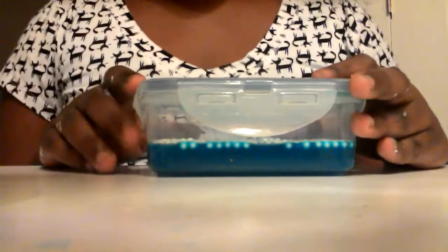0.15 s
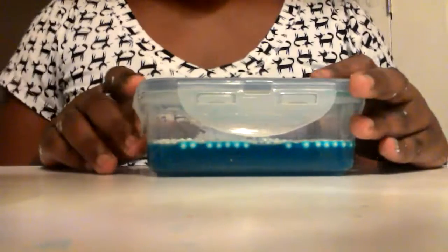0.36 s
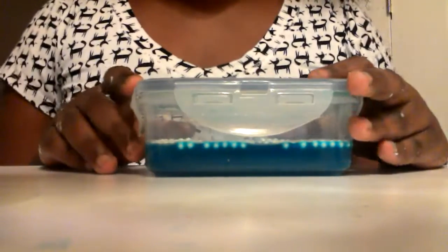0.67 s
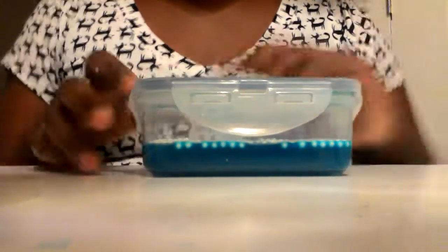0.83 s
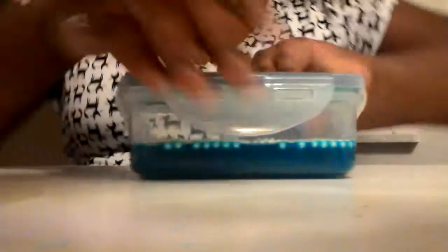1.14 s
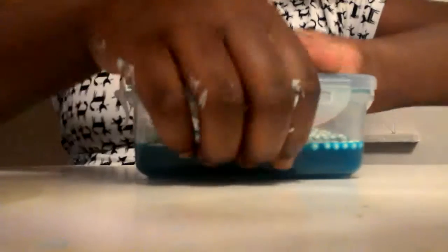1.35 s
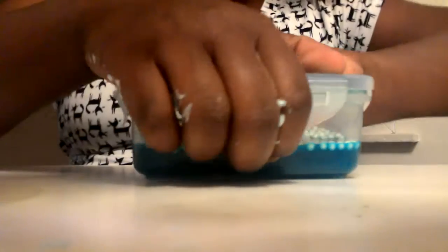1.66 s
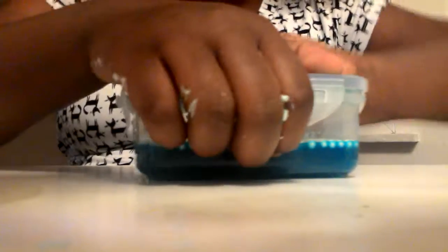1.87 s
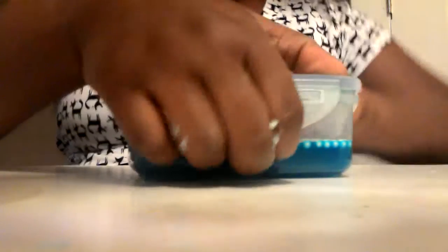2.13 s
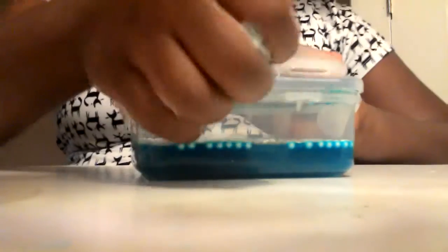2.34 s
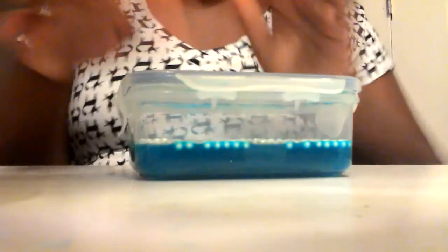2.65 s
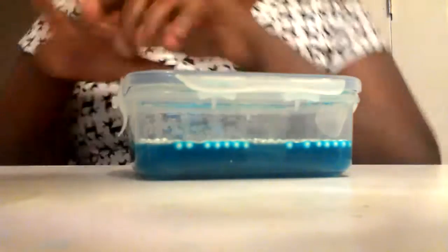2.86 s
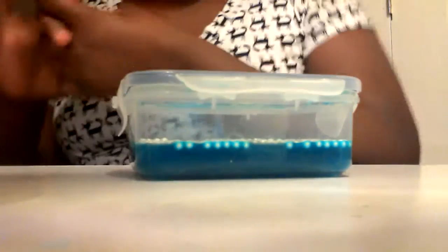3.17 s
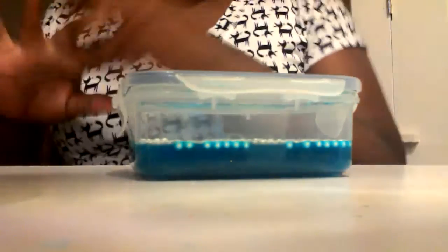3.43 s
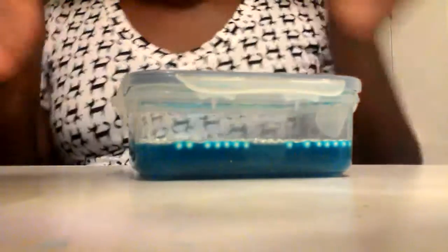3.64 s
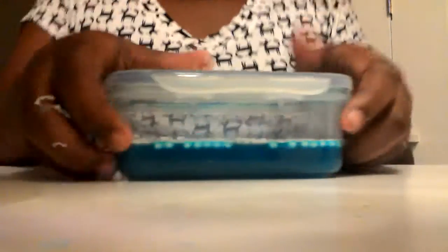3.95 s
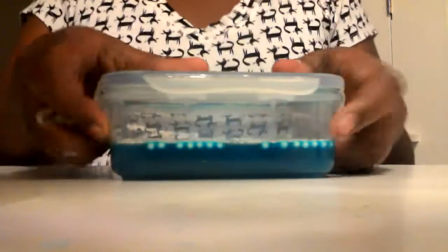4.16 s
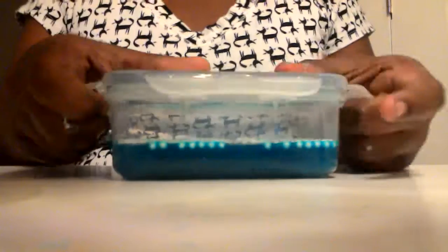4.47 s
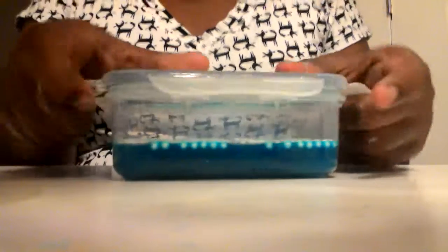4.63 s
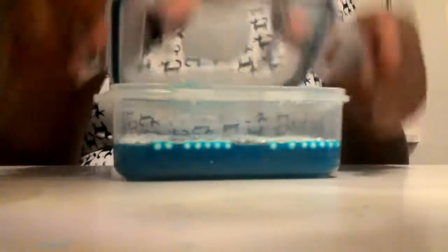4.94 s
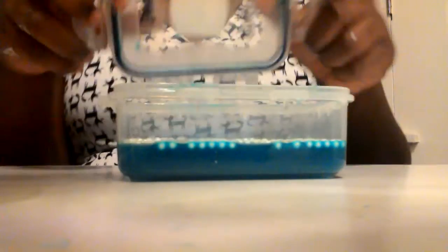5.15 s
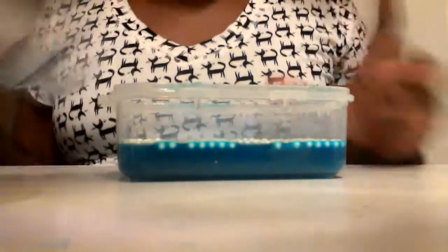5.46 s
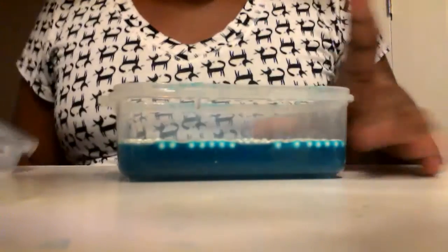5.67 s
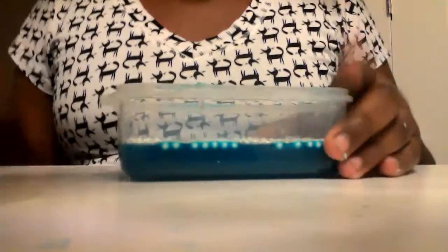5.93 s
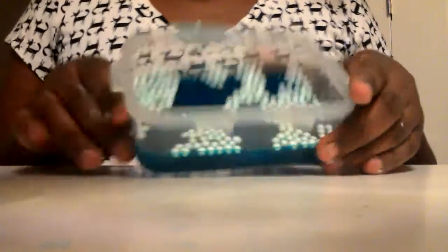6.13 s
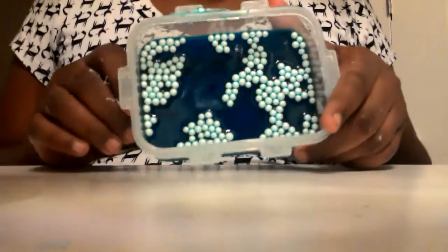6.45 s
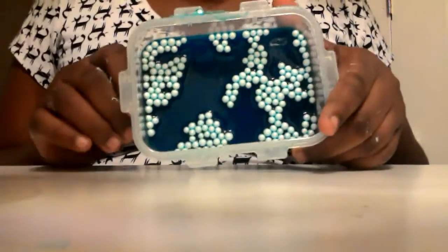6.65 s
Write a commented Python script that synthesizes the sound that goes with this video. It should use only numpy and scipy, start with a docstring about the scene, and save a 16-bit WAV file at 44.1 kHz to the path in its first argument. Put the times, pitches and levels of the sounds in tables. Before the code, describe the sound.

Close by on a table, fingertips tap lightly on a hollow plastic box with faint squeaks. One latch snaps very loudly, then another more softly; after a pause two more pop, with tiny rubbery seal slips between them. The loose lid drops, rattles and skids. A small hard room adds short reflections over a deep hum that fades at the end.

```python
"""Plastic food box opened

Fingers tap a food box on a table close by, four latches snap up, a rubber seal slips, the lid drops and slides.
Walls, hollow, lid and table are damped resonances; hard edges are sprays of noise, rubbing is trains of slips.
Low squeaks come with the fingers, a plastic ring dies away at the start, the table booms under the snaps.
A small hard room answers, and a low hum runs underneath until its low end sinks away."""
import sys
import numpy as np
from scipy import signal
from scipy.fft import rfft, irfft, next_fast_len
from scipy.io import wavfile
from scipy.ndimage import uniform_filter1d

SR = 44100
rng = np.random.default_rng(int(sys.argv[2]) if len(sys.argv) > 2 else 0)


def wav_out(sig):
    """Save sig, one row per channel (or a flat mono array), as 16-bit PCM at SR to the path in sys.argv[1]."""
    wavfile.write(sys.argv[1], SR, np.round(np.clip(np.atleast_2d(sig).T, -1, 1) * 32767).astype(np.int16))


N = 299880
T = np.arange(N) / SR
RING = T[:SR // 2]
SHORT = T[:SR // 10]  # a plastic panel has died away within this time

# All event levels are relative: layer trims and the final mix come on top.

# fingers landing on the box: start_s, wall_db, nail_crack_db, hollow_db
TAPS = [(0.6055, -41.5, -78, -48.5), (0.658, -46.5, -81, -42.5), (0.7689, -42.5, -62.5, -38),
        (0.9452, -40.5, -74, -50.5), (0.986, -56, -90, -46), (1.0913, -27, -56, -33.5),
        (1.184, -51, -64, -61), (1.386, -67.5, -74, -72), (2.369, -67, -74, -58), (3.7324, -41, -77, -40.5),
        (3.7838, -44, -88, -41), (3.8444, -37, -75, -50.5), (4.559, -65, -68, -70)]
TAP_HZ, TAP_WIDTH_HZ = 860, 400  # the wall's flex under a fingertip
TAP_TOP_HZ = 10800  # upper edge of a nail's crack
TAP_THUMP_DB = -8  # table thump against the wall, before the wall trim
# latches slipping, snapping free and flapping back:
# start_s, wall_db, wall_pitch_hz, wall_width_hz, crack_db, crack_top_hz, hollow_db, table_thump_db
SNAPS = [(1.5738, -27, 1020, 268.7, -42.5, 9000, -38.5, -59.5),
         (1.5908, -4, 1017, 480, -12.5, 15510, -14.5, -31),
         (2.062, -19, 760, 280.3, -34.5, 9500, -27.5, -40.5),
         (2.0858, -36.5, 867, 440, -58, 9500, -41.5, -52),
         (4.1835, -29.5, 1427, 300, -44.5, 8240, -59.5, -51),
         (4.1857, -28.5, 787, 257, -43, 8500, -43.5, -37),
         (4.3154, -24.5, 910, 450, -29, 11200, -28.5, -28.5),
         (4.3258, -24, 1010, 620, -40, 10000, -35, -66.5), (4.3625, -30, 860, 345, -50.5, 10000, -64, -57),
         (4.872, -51.5, 1230, 250, -63.5, 14000, -62.5, -50),
         (4.9201, -12.5, 1180, 305, -28.5, 13000, -33.5, -40)]


def blows():
    """Taps and snaps both strike the box; rows: start_s, wall_db, pitch_hz, width_hz, hollow_db, table_thump_db."""
    taps = [(s, db, TAP_HZ, TAP_WIDTH_HZ, hollow, db + TAP_THUMP_DB) for s, db, _, hollow in TAPS]
    snaps = [(s, db, hz, width, hollow, thump) for s, db, hz, width, _, _, hollow, thump in SNAPS]
    return taps + snaps


# resonances of the box walls: pitch_hz, width_hz, level_db
WALL_MODES = [(620, 330, 6.5), (810, 99, -0.5), (1090, 50, -10.5), (1210, 380, 1.5), (1333, 45, 5),
              (1600, 47, -15), (1870, 170, -18.5)]
# resonances of the hollow inside the box: pitch_hz, width_hz, level_db
HOLLOW_MODES = [(306.7, 17, -12), (397.6, 100, 0.5), (437, 15, 0.5), (503.2, 180, -2.5), (571, 67, -7.5)]
# resonances of the table top: pitch_hz, width_hz, level_db
TABLE_MODES = [(106, 38, -10), (142.2, 27, 4), (190, 14, -12.5), (265, 15, -9.5)]


def box(wall_db=1, wall_ring_db=1, wall_lag_s=0.00027, hollow_lag_s=.004, spot_db=2, hollow_spot_db=4):
    """Each blow flexes a wall, differently at each spot; the hollow and the table answer more slowly."""
    out = np.zeros(N)
    table = ring(TABLE_MODES) * (1 - np.exp(-RING / .005))
    for s, db, hz, width, hollow_db, table_db in blows():
        push = flex(hz, width)
        walls = through(push, struck(WALL_MODES, spot_db))
        hollow = struck(HOLLOW_MODES, hollow_spot_db) * (1 - np.exp(-SHORT / .004))
        add(out, s + wall_lag_s, burst(push + undb(wall_ring_db) * walls, db + wall_db))
        add(out, s + hollow_lag_s, burst(hollow, hollow_db, span=.025))
        add(out, s, burst(table, table_db, span=.04))
    return out


def flex(hz, width):
    """A plastic panel springs back: a few cycles that swell and die."""
    # .644 makes width the half-power bandwidth in Hz
    return SHORT * np.exp(-np.pi * width * SHORT / .644) * np.sin(2 * np.pi * hz * SHORT)


def struck(modes, spot_db):
    """Ring of a panel hit at a random spot, which favours some modes over others."""
    shifts = spot_db * rng.standard_normal(len(modes))
    return ring([(hz, width, db + shift) for (hz, width, db), shift in zip(modes, shifts)], SHORT)


# resonances of a latch: pitch_hz, width_hz, level_db
LATCH_MODES = [(1740, 390, -2.5), (2410, 440, -6.5), (2964, 170, -3), (4150, 1191, 2.5), (4900, 610, -1),
               (5263, 54, -4), (7040, 170, -2), (9700, 710, -11.5)]


def latch_cracks(db=2):
    """Sharp edges of the latches and fingernails crack on the box and ring the stiff latch parts."""
    hits = [(s, crack, top_hz) for s, _, _, _, crack, top_hz, _, _ in SNAPS]
    hits += [(s, crack, TAP_TOP_HZ) for s, _, crack, _ in TAPS]
    return undb(db) * cracks(hits, LATCH_MODES, decay=0.0013, ring_db=4.5)


# tone colour of hard plastic contacts: pitch_hz, level_db
CRACK = [(300, -20), (1200, 1), (2000, 1.5), (3500, -4), (6000, -4.5), (9500, -5), (11500, -15),
         (16000, -21)]


def cracks(hits, modes, decay, ring_db, spot_db=4):
    """Hard edges slip past each other: a spray of micro-contacts rings the stiff parts, each spot differently."""
    out, t = np.zeros(N), RING[:SR // 20]
    rings = np.array([colour(ring([mode], t), CRACK) for mode in modes])
    tick = colour(signal.unit_impulse(len(t)), CRACK)
    for s, db, top_hz in hits:
        mode_gains = undb(ring_db + spot_db * rng.standard_normal(len(modes)))
        stiff = tick + mode_gains @ rings
        spray = dull(rng.standard_normal(len(t)) * np.exp(-t / decay), top_hz, order=3)
        add(out, s, burst(through(spray, stiff), db))
    return out


# the rubber seal slipping off the rim: start_s, level_db, pitch_hz
SEAL_SLIPS = [(4.6069, -43, 790), (4.619, -42.5, 795), (4.6585, -40.5, 794), (4.6723, -35, 841)]
SEAL_WIDTH_HZ, SEAL_RISE_S, SEAL_FALL_S = 116, 0.0072, 0.0097


def seal(squeak_db=-5, tick_db=-33):
    """The rubber seal peels off in jerks: each one ticks, flexes the lid and squeaks briefly."""
    ticks = [(s, db + tick_db, TAP_TOP_HZ) for s, db, _ in SEAL_SLIPS]
    out = cracks(ticks, LATCH_MODES, decay=0.0015, ring_db=3)
    for s, db, hz in SEAL_SLIPS:
        add(out, s, burst(flex(hz, SEAL_WIDTH_HZ), db))
        squeak = swell(s, SEAL_RISE_S, SEAL_FALL_S) * wavering_tone(hz, blur_db=-12.5, size=160)
        out += undb(db + squeak_db) * squeak
    return out


# the loose lid landing and rocking on the table: start_s, body_db, pitch_hz, crack_db, slap_db
LID_HITS = [(5.4414, -19.5, 1230, -24, -37), (5.4449, -33, 1090, -22.5, -41),
            (5.526, -29.5, 1090, -33, -46), (5.63, -38.5, 1300, -39, -47.5), (5.656, -42, 1330, -52, -52),
            (5.7088, -23.5, 970, -39.5, -34.5), (5.741, -37, 1200, -46.5, -64),
            (5.7729, -38, 1120, -51.5, -58), (5.8085, -34.5, 1100, -51.5, -66),
            (5.818, -39, 1050, -46.5, -47), (5.8647, -36.5, 1520, -54, -51),
            (5.9046, -42, 1400, -52.5, -46), (5.9477, -27.5, 1300, -42, -58),
            (5.9783, -39, 1210, -37.5, -37.5), (5.9935, -23.5, 1300, -31, -61),
            (6.0311, -34.5, 1300, -39.5, -68), (6.052, -39.5, 1150, -43, -40.5),
            (6.072, -37.5, 1217, -44, -69)]
REBOUND_S, REBOUND_DB = .018, -18.5  # mean time between hops, level change per hop


def rocking(count=2):
    """Each knock of the lid is followed by weaker hops at uneven times; rows as in LID_HITS."""
    knocks = list(LID_HITS)
    uneven = rng.uniform(.5, 1.5, (len(LID_HITS), count))
    for (s, db, hz, crack, slap), gaps in zip(LID_HITS, uneven):
        for k, hop in enumerate(REBOUND_S * np.cumsum(gaps)):
            loss = REBOUND_DB * (k + 1)
            knocks.append((s + hop, db + loss, hz, crack + loss, slap + loss))
    return knocks


# resonances of the loose lid: pitch_hz, width_hz, level_db
LID_MODES = [(430, 141, 2.5), (760, 166, 9), (826, 23, -3), (1120, 40.5, 6.5), (1230, 68, 6.5),
             (1302, 86, -2), (1643, 123, 11), (1827, 59, 13), (2200, 120, -31)]
# resonances of the air slapped under the lid: pitch_hz, width_hz, level_db
LID_SLAP_MODES = [(290, 8.77, -16), (317, 34, 1), (401, 100, 6.5), (682, 87, 5.5)]


def lid(knocks, body_db=1, slap_db=-1, dull_db=-14, spot_db=4):
    """Each knock flexes the free lid, rings its modes and slaps the air beneath it."""
    out = np.zeros(N)
    slap = ring(LID_SLAP_MODES) * (1 - np.exp(-RING / 0.0037))
    for s, db, hz, _, low_db in knocks:
        push = flex(hz, width=590)
        body = through(push, struck(LID_MODES, spot_db)) + undb(dull_db) * push
        add(out, s, burst(body, db + body_db))
        add(out, s, burst(slap, low_db + slap_db, span=.02))
    return out


# resonances of the lid's stiff rim: pitch_hz, width_hz, level_db
LID_RIM_MODES = [(2380, 80, -8), (3920, 80, -1.5), (4960, 700, -2), (5750, 130, 1), (7340, 180, -8.5),
                 (7260, 220, -4.5), (8820, 650, -5)]


def rim_cracks(knocks, db=2, top_hz=17000):
    """The hard rim of the lid ticks on the table and rings."""
    hits = [(s, crack, top_hz) for s, _, _, crack, _ in knocks]
    return undb(db) * cracks(hits, LID_RIM_MODES, decay=0.0037, ring_db=8.5)


# the lid skidding: peak_s, level_db, rise_s, fall_s
SKIDS = [(5.455, -38, 0.011, 0.075), (6.0, -44.5, .03, 0.063)]


def slide():
    """The lid skids over the table, its friction noise swelling and dying with each skid."""
    speed = sum(undb(db) * swell(s, rise, fall) for s, db, rise, fall in SKIDS)
    return friction(LID_MODES + LID_RIM_MODES, rate=1100, scatter_db=4.5, ring_db=-8) * speed


def friction(modes, rate, scatter_db, ring_db):
    """A sliding surface catches and slips, rate times a second on average, in uneven steps that ring the plastic."""
    slips = (rng.random(N) < rate / SR) * rng.standard_normal(N)
    slips = slips * undb(scatter_db * rng.standard_normal(N))
    return level(colour(slips, CRACK) + undb(ring_db) * through(slips, ring(modes)), 0)


# fingers rubbing as they shift their grip: start_s, length_s, level_db
RUBS = [(0.272, 1, -73.5), (1.122, 0.15, -63.5), (1.25, .9, -71.5), (3.674, 0.46, -75), (4.16, 0.17, -63),
        (4.3, 0.46, -70.5)]
PRE_SNAP_DB, PRE_SNAP_RISE_S = -33.5, 0.011  # noise before a snap: level against its listed wall_db, rise time


def rub(release=.003):
    """Skin drags on the walls; a faint grainy noise swells for milliseconds before each snap and stops quickly after."""
    grip = sum(undb(db) * arch(start, length) for start, length, db in RUBS)
    pre_snap = sum(undb(db + PRE_SNAP_DB) * swell(s, PRE_SNAP_RISE_S, release) for s, db, *_ in SNAPS)
    return friction(WALL_MODES, rate=1500, scatter_db=3, ring_db=18) * (grip + pre_snap)


# faint low squeaks as the fingers shift on the box: start_s, length_s, pitch_hz, level_db
SQUEAKS = [(0.112, 0.24, 373, -58.5), (0.367, 0.095, 299, -55.5), (0.863, 0.12, 578, -53.5)]
SQUEAK_BEND = 0.037  # share by which the pitch sags at the ends of a squeak


def squeaks():
    """A dragging fingertip sings louder and a little higher the harder it presses."""
    out = np.zeros(N)
    for start, length, hz, db in SQUEAKS:
        press = arch(start, length)
        pitch_hz = hz * (1 - SQUEAK_BEND * (1 - press))
        out += undb(db) * press * wavering_tone(pitch_hz, blur_db=0, size=1200)
    return out


def wavering_tone(hz, blur_db, size):
    """A narrow tone on a steady or moving pitch, blurred by a random wobble of its strength and phase."""
    wobble = []
    for _ in range(2):
        smooth = uniform_filter1d(uniform_filter1d(rng.standard_normal(N), size), size)  # size in samples
        wobble.append(level(smooth, blur_db))
    phase = 2 * np.pi * np.cumsum(hz * np.ones(N)) / SR
    return (1 + wobble[0]) * np.sin(phase) + wobble[1] * np.cos(phase)


def opening_tail(db=-54, decay=0.073, top_hz=3500):
    """A plastic ring is dying away as the scene begins."""
    tail = friction(WALL_MODES + LID_RIM_MODES, rate=6400, scatter_db=-1.0, ring_db=19)
    return dull(tail, top_hz, order=1) * undb(db) * np.exp(-T / decay)


# first bounces off the table top and the person behind the box: delay_s, level_db
NEAR_ECHOES = [(.0009, -17.5), (.0019, -14.5), (.0034, -9)]


def near_echoes(x):
    """Surfaces within arm's length stretch each click by a few milliseconds."""
    out = x.copy()
    for delay, db in NEAR_ECHOES:
        add(out, delay, undb(db) * x)
    return out


# ring time of the room: pitch_hz, t60_s
ROOM_T60 = [(150, 0.42), (500, 0.34), (1200, 0.4), (3000, 0.35), (8000, 0.42), (15000, 0.6)]
# tone colour of the room: pitch_hz, level_db
ROOM_COLOUR = [(100, 4.5), (250, 2.5), (430, -1), (700, -7), (1200, -7.5), (1700, -6), (2500, -6),
               (5000, -7.5), (9000, -6.5), (16000, -18)]


def room(wet_db=-3, early_db=4, early_decay=0.01, gap=0.0065):
    """Small hard room: strong early reflections, then diffuse noise with its own decay time in each band."""
    t = T[:SR]
    noise, hz = rfft(rng.standard_normal(SR)), np.fft.rfftfreq(SR, 1 / SR)
    octave = np.round(2 * np.log2(np.maximum(hz, 64))) / 2  # half-octave bands
    tail = 0
    for k in np.unique(octave):
        fade = np.exp(-np.log(1000) * t / over_hz(ROOM_T60, 2 ** k))
        tail = tail + irfft(noise * (octave == k)) * fade
    tail = tail * np.clip(t / gap - .5, 0, 1)  # silence before the first reflections
    tail = tail * (1 + undb(early_db) * np.exp(-t / early_decay))
    return colour(tail / np.sqrt(np.sum(tail ** 2)), ROOM_COLOUR) * undb(wet_db)


# standing waves of the room: pitch_hz
ROOM_MODES_HZ = [263, 376, 448, 607, 714, 808, 883, 997, 1119]


def standing_waves(width_hz=8, db=-4.0, build_s=0.012):
    """Lone room resonances build up and sing on after a knock."""
    return ring([(hz, width_hz, db) for hz in ROOM_MODES_HZ]) * (1 - np.exp(-RING / build_s))


# tone colour of the hum, its overall level set by HUM_DB: pitch_hz, level_db
HUM = [(15, -12), (28, -4), (42, -2), (62, -5), (90, -25.5), (122, -11), (165, -32), (230, -34),
       (290, -35.5), (400, -50), (1000, -49), (1500, -60.5), (2500, -71.5), (6000, -66), (16000, -71)]
HUM_DB = -43  # rms of the rumble before its fade
HUM_FADE_S, HUM_FADE_DB_PER_S = 6.2, 27  # when the low end starts to sink away, and how fast


def hum(mains_hz=120, mains_db=-64, fade_below_hz=380):
    """Low machine rumble from coloured noise, with a weak mains line and faint hiss; its lows sink at the end."""
    rumble = level(colour(rng.standard_normal(N), HUM), HUM_DB)
    rumble = rumble + undb(mains_db) * np.sin(2 * np.pi * mains_hz * T)
    lows = dull(rumble, fade_below_hz, order=1)
    fade = undb(-HUM_FADE_DB_PER_S * np.maximum(T - HUM_FADE_S, 0))
    return lows * fade + rumble - lows


def undb(db):
    """Decibels to gain."""
    return 10 ** (np.asarray(db) / 20)


def over_hz(rows, hz):
    """A table read on a log-frequency axis."""
    points, values = np.transpose(rows)
    return np.interp(np.log(hz + 1), np.log(points), values)


def colour(x, spectrum):
    """Causal (minimum-phase) filter through the given pitch_hz, level_db points."""
    size = 2 * next_fast_len(len(x))
    gain = undb(over_hz(spectrum, np.fft.rfftfreq(size, 1 / SR)))
    cepstrum = irfft(np.log(gain))
    # folding the cepstrum forward makes the filter causal
    cepstrum[1:size // 2] *= 2
    cepstrum[size // 2 + 1:] = 0
    return irfft(rfft(x, size) * np.exp(rfft(cepstrum)))[:len(x)]


def through(x, response):
    """Convolve and keep the length."""
    return signal.fftconvolve(x, response)[:len(x)]


def ring(modes, t=RING):
    """Impulse response of damped resonances; each spectral peak reaches its own dB."""
    out = 0
    for hz, width, db in modes:
        peak = undb(db) * 2 * np.pi * width / SR
        out = out + peak * np.exp(-np.pi * width * t) * np.cos(2 * np.pi * hz * t)
    return out


def dull(x, hz, order):
    """Low-pass."""
    return signal.sosfilt(signal.butter(order, min(hz, .45 * SR), fs=SR, output="sos"), x)


def burst(x, db, span=.01):
    """Scale a hit to an rms level over its first span seconds."""
    return x * undb(db) / np.sqrt(np.mean(x[:int(span * SR)] ** 2))


def level(x, db):
    """Scale to an rms level."""
    return x * undb(db) / np.std(x)


def add(track, s, x):
    """Mix a sound in at time s."""
    i = int(s * SR)
    track[i:i + len(x)] += x[:N - i]


def arch(start, length):
    """Pressure that builds and eases: half a sine, 0-1."""
    return np.sin(np.pi * np.clip((T - start) / length, 0, 1))


def swell(s, rise, fall):
    """Exponential rise to a peak of 1 at time s, then an exponential fall."""
    return np.exp(-np.minimum(np.maximum((s - T) / rise, (T - s) / fall), 40))


def scene(direct_db=-2, lid_wet_db=3.0, count=3):
    """The box stands close by; the lid lands further off and so sounds wetter."""
    knocks = rocking()
    near = box() + rub() + squeaks() + seal()
    far = lid(knocks) + slide()
    direct = undb(direct_db) * near_echoes(near + far + latch_cracks() + rim_cracks(knocks))
    radiated = near + undb(lid_wet_db) * far
    echo = through(radiated, room()) + through(radiated, standing_waves())
    # a crack radiates differently in each direction, so each part of the room hears its own
    for _ in range(count):
        sharp = latch_cracks() + undb(lid_wet_db) * rim_cracks(knocks)
        echo = echo + through(sharp, room()) / np.sqrt(count)
    return (direct + echo + opening_tail() + hum())[None]


TOP_HZ = 16300


def record(dry):
    """Soft saturation rounds the loud peaks, then a steep low-pass cuts the top."""
    rounded = np.tanh(0.65 * dry)
    return signal.sosfilt(signal.ellip(8, .2, 70, TOP_HZ, fs=SR, output="sos"), rounded)


dry = scene()
out = record(dry)
wav_out(out)
```